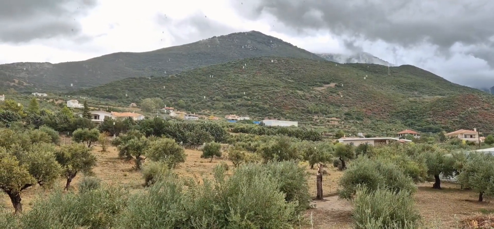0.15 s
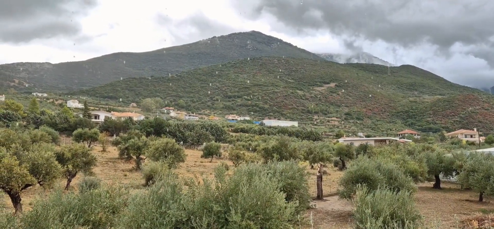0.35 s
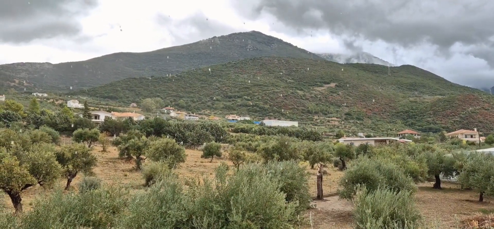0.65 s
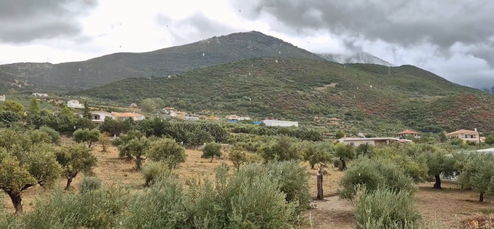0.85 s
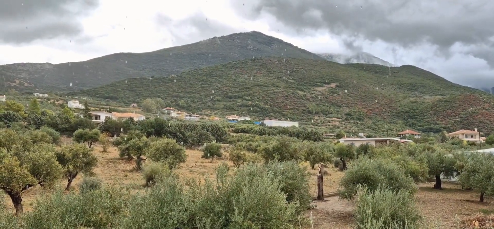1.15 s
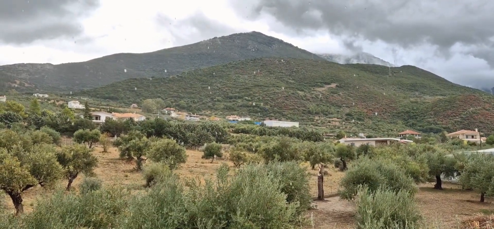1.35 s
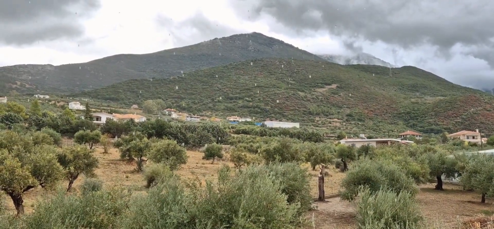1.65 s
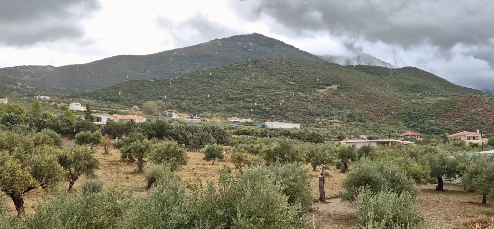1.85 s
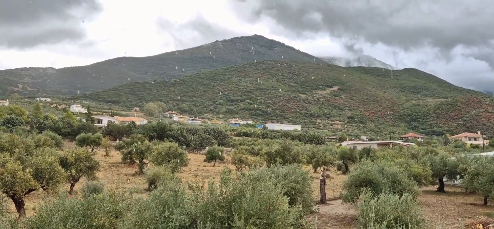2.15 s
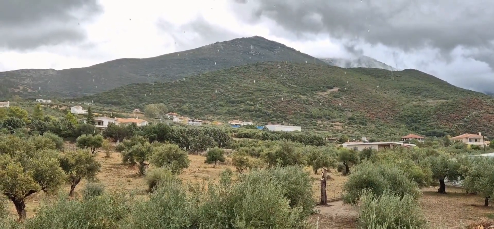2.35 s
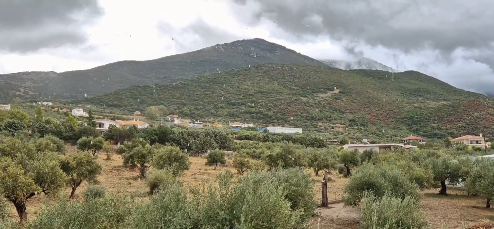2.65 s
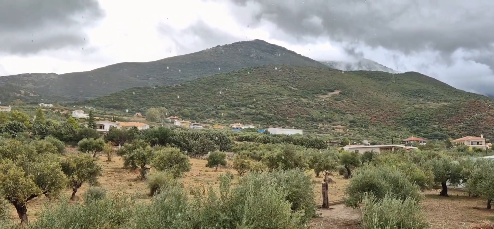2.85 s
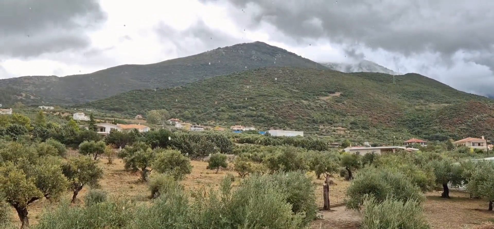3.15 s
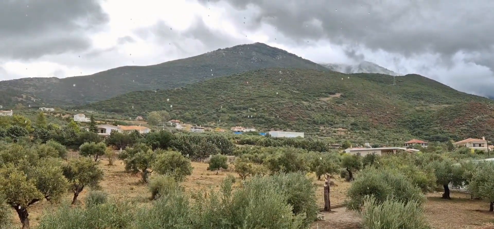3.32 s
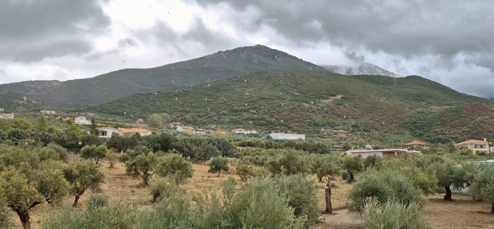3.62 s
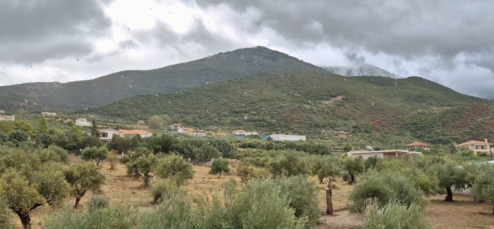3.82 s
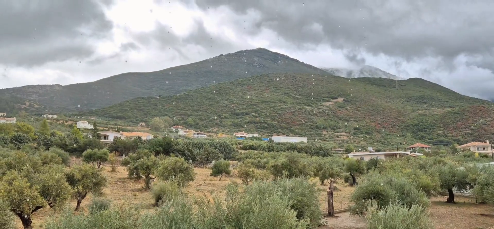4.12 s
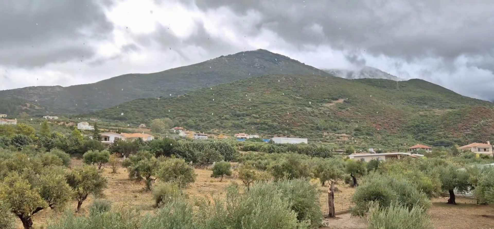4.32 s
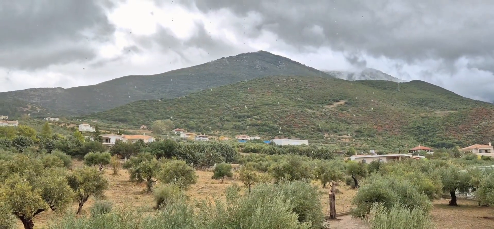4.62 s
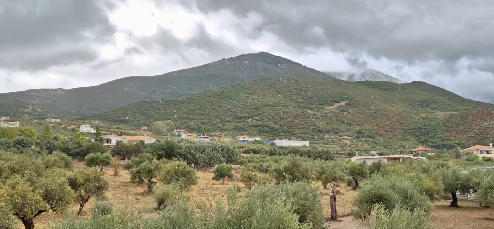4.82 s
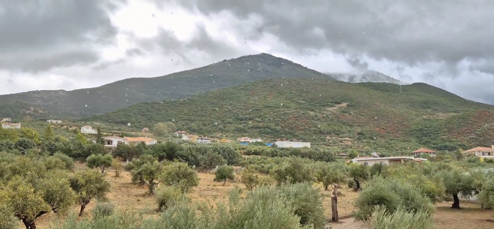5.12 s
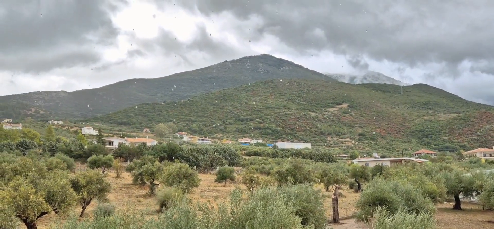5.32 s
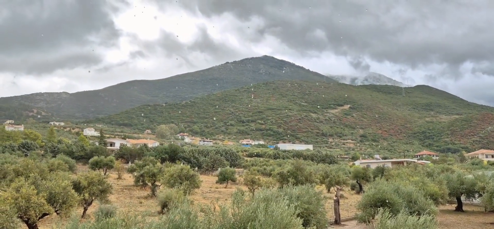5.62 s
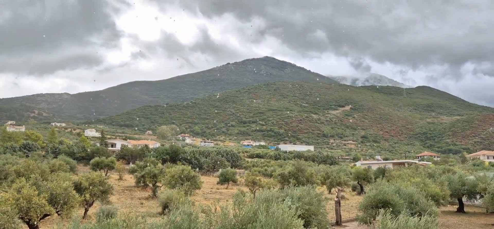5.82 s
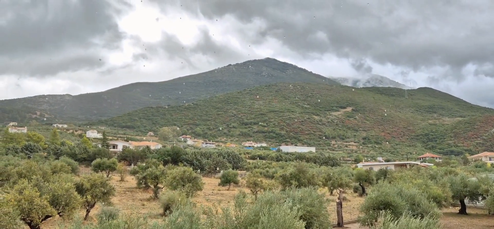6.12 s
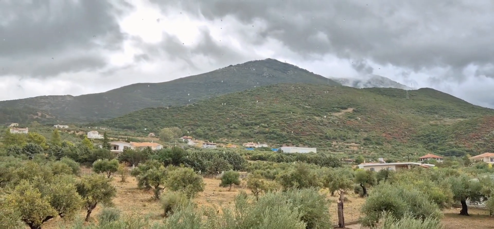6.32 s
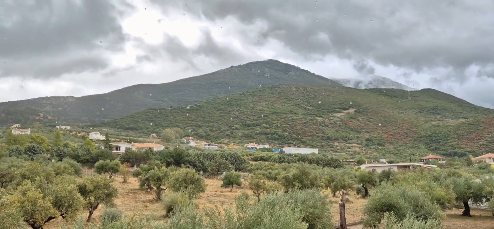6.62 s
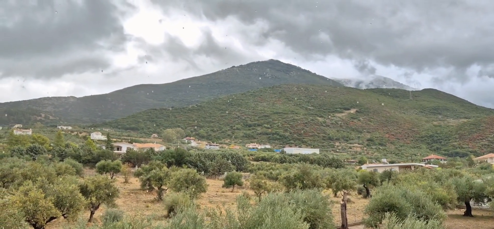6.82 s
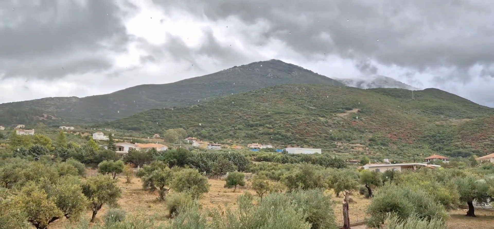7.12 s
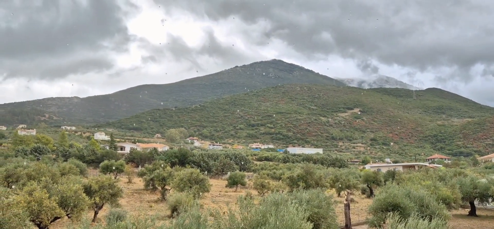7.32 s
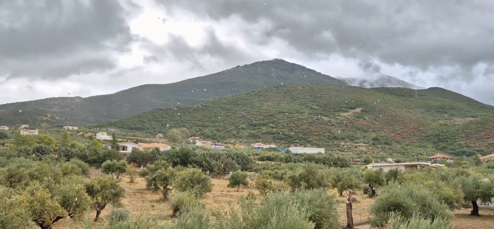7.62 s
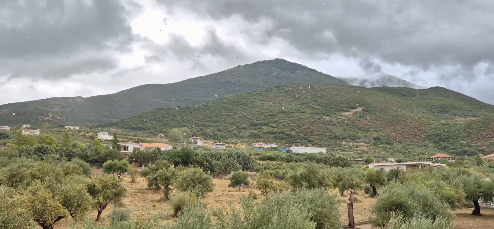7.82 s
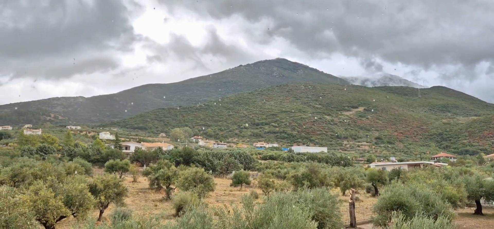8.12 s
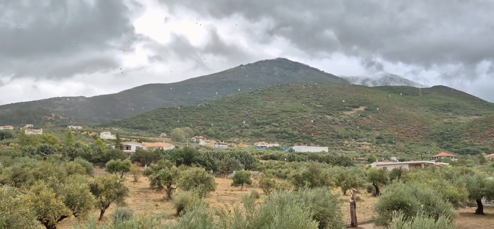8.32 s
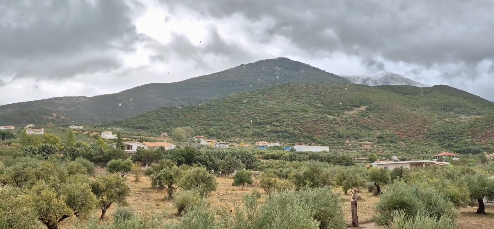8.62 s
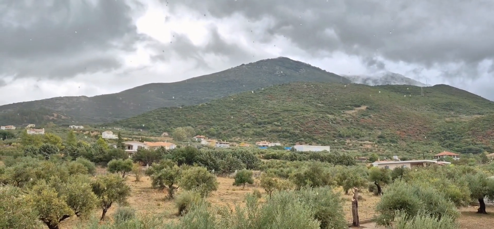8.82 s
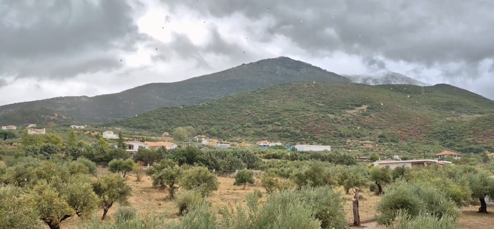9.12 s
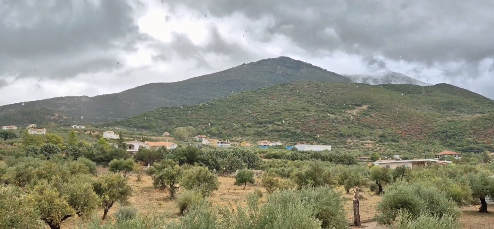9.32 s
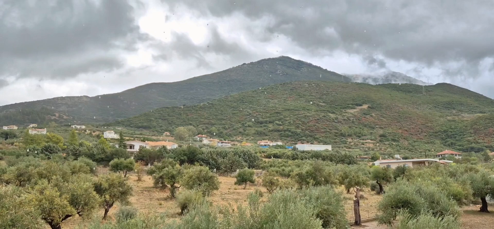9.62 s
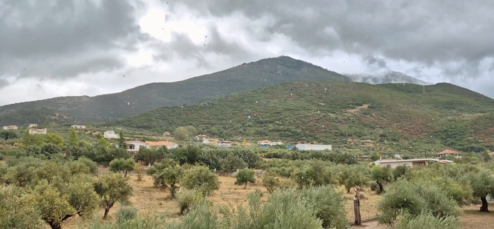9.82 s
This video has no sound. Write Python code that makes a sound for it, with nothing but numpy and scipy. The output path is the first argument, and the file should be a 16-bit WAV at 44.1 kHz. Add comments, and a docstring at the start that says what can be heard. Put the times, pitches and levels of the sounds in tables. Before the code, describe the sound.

Fat raindrops drip in irregular clumps from a roof edge onto wet paving, crisp and close, over steady soft rain across a hillside.

```python
"""Fat drops falling in clumps from a roof edge onto wet paving, in steady rain on a hillside.
Each drop is a shaped noise burst; the spray around it is thousands of short ringing ticks. Both echo
under the porch through decaying noise tails. Behind them: rain in the trees as smooth noise, a far-off
drone of resonated noise that swells, fades and swells again, a brief low hum before its first swell,
and light wind puffs at the two microphone ports as low noise swings."""
import sys
import numpy as np
from scipy import signal
from scipy.fft import rfft, irfft, next_fast_len
from scipy.io import wavfile
from scipy.ndimage import uniform_filter1d

SR = 44100
rng = np.random.default_rng(int(sys.argv[2]) if len(sys.argv) > 2 else 0)


def pcm_store(signal):
    """Save signal as 16-bit PCM."""
    levels = np.round(np.clip(np.atleast_2d(signal), -1, 1) * 32767)
    wavfile.write(sys.argv[1], SR, levels.astype(np.int16).T)


N = 438794

# clumps of droplets landing around the fat drops:
# (time of peak [s], level [dB], rise [s], fullness below 3 kHz [dB])
CLUMPS = [(0.07, -35, 0.051, 4), (0.148, -39.5, 0.022, -5), (0.25, -39.5, 0.01, 1.5),
          (0.3, -40.5, 0.048, 0), (0.348, -38.5, 0.043, -1.5), (0.43, -32.5, 0.011, -5.0),
          (0.495, -37, 0.031, 4.5), (0.64, -40.0, 0.018, -2), (0.683, -30.5, 0.028, 5),
          (0.813, -48, 0.018, 1.5), (0.902, -39.5, 0.044, 3.5), (1.011, -37.5, 0.049, -3),
          (1.065, -34, 0.014, 2), (1.133, -30.5, 0.029, 5.5), (1.233, -32, 0.011, 3.5),
          (1.436, -43.5, 0.07, -4.5), (1.533, -37.5, 0.019, 0.5), (1.577, -36.5, 0.015, 0.0),
          (1.7, -37, 0.04, -3.5), (1.753, -35.0, 0.016, 7), (1.817, -30, 0.012, 5),
          (1.865, -34, 0.008, 4.5), (1.902, -37, 0.04, -2), (1.952, -33, 0.012, 2.0),
          (2.04, -32.5, 0.0097, 0.5), (2.095, -40, 0.008, 3.5), (2.17, -41.5, 0.012, 0),
          (2.221, -42, 0.049, -12), (2.411, -37, 0.012, 2.5), (2.452, -35.5, 0.03, -0.5),
          (2.656, -38.5, 0.014, -1), (2.692, -48, 0.048, -1.5), (2.728, -35.5, 0.018, 2),
          (2.81, -44.5, 0.03, -4), (2.953, -30.5, 0.016, 2.5), (3.103, -39, 0.053, -1),
          (3.341, -38.5, 0.046, 4), (3.447, -33, 0.017, 2.5), (3.56, -35.5, 0.011, 3.5),
          (3.721, -43.5, 0.028, -18), (3.93, -35, 0.022, 4.5), (3.996, -34.5, 0.017, 7.0),
          (4.088, -40.5, 0.017, -4), (4.147, -35, 0.022, 3.5), (4.24, -36.5, 0.013, -4.5),
          (4.317, -36.5, 0.017, 3), (4.438, -43, 0.016, -2), (4.539, -33, 0.015, 2),
          (4.727, -33, 0.0095, 5), (4.859, -38.5, 0.026, 2.0), (4.907, -37.0, 0.016, 4),
          (4.977, -38.5, 0.019, -2.0), (5.079, -36.5, 0.025, 4.0), (5.18, -30, 0.013, 4),
          (5.364, -36.5, 0.039, 2), (5.428, -38.5, 0.013, -12), (5.626, -42.5, 0.039, -2),
          (5.722, -39, 0.06, -10), (5.833, -38.5, 0.014, 3), (5.948, -37.5, 0.043, -5),
          (6.094, -34, 0.014, 2.5), (6.181, -45, 0.013, -8), (6.318, -44, 0.033, -1),
          (6.519, -37, 0.017, 3), (6.589, -42.5, 0.012, -13), (6.74, -38, 0.03, -14),
          (6.961, -38, 0.011, 0.5), (7.115, -42, 0.011, 1.5), (7.302, -33.5, 0.029, 5.5),
          (7.413, -35, 0.036, 2), (7.554, -36, 0.019, 2.5), (7.643, -33.5, 0.015, -4.5),
          (7.728, -44, 0.009, -12), (7.788, -48, 0.024, -10), (7.89, -37.5, 0.011, -2.0),
          (7.979, -42.5, 0.03, -8), (8.032, -31, 0.011, 4), (8.173, -36, 0.013, 2.5),
          (8.244, -42, 0.0054, -2.5), (8.285, -45, 0.012, 2), (8.37, -40, 0.0053, -15),
          (8.663, -44, 0.026, 1), (8.766, -31.5, 0.022, 2.5), (8.862, -40.5, 0.054, -7),
          (8.98, -32, 0.013, 2.5), (9.037, -34.5, 0.009, 2.5), (9.166, -31, 0.018, 3.5),
          (9.312, -38.5, 0.016, -5), (9.358, -32, 0.013, 1.5), (9.442, -30.5, 0.0087, 0.0),
          (9.534, -33.5, 0.013, -4.5), (9.6, -44, 0.0088, -5), (9.664, -49, 0.01, -7),
          (9.743, -43.5, 0.008, -5), (9.829, -38.0, 0.014, 2.5), (9.886, -39, 0.011, 1),
          (9.947, -34.5, 0.0092, 7)]
# wind puffs at the ports: (time [s], peak [dB], pitch [Hz], half-length [s], left minus right [dB])
PUFFS = [(0.403, -40, 101, 0.064, 13), (0.948, -37, 121, 0.03, 19), (1.024, -35.5, 153, 0.082, 20),
         (1.172, -37, 76, 0.019, -1), (1.275, -32, 80, 0.036, -11), (1.36, -27, 55.6, 0.069, -7),
         (3.214, -36, 73, 0.12, 19), (3.302, -35.5, 54, 0.056, -9), (3.501, -39.5, 57.7, 0.044, -13),
         (3.786, -38, 95, 0.05, 13), (3.923, -43, 95, 0.103, 16), (4.03, -39, 93.5, 0.024, 14),
         (4.36, -41, 42, 0.13, 9), (4.462, -33, 127, 0.074, 14), (4.68, -41, 52, 0.034, 18),
         (4.752, -37, 100, 0.056, 21), (6.198, -37, 99, 0.13, 14), (6.34, -33, 99, 0.11, 18),
         (6.652, -25.5, 55, 0.066, -4), (6.767, -41, 38, 0.058, -7), (7.1, -45, 35, 0.1, 2),
         (7.346, -46, 38, 0.12, 0)]
PORT_OFFSET_SAMPLES = 14  # between ports: the eave sounds lead on the right, the wash on the left


def amp(db):
    """Amplitude of a level in dB."""
    return 10 ** (np.asarray(db) / 20)


def unit(x):
    """Scales to rms 1."""
    return x / np.sqrt(np.mean(x ** 2) + 1e-20)


def over_hz(points, hz):
    """Reads a spectrum table on a log-frequency axis."""
    f, value = np.transpose(points)
    return np.interp(np.log(hz + 1), np.log(f + 1), value)


def over_time(rows, column=1):
    """Reads one column of a time table at every sample."""
    rows = np.array(rows)
    return np.interp(np.arange(N) / SR, rows[:, 0], rows[:, column])


def resonate(x, hz, width_hz):
    """One-pole resonance of gain 1: shift hz down to zero, smooth, shift back."""
    turn = np.exp(2j * np.pi * np.cumsum(hz * np.ones(x.shape[-1])) / SR)
    r = np.exp(-np.pi * width_hz / SR)
    return 2 * (turn * signal.lfilter([1 - r], [1, -r], x / turn)).real


def drift(fastest_hz):
    """Random wandering of rms 1: a sum of slow sines, the slower the stronger."""
    t = np.arange(0, N + 512, 256) / SR
    rates_hz = fastest_hz * np.geomspace(.05, 1, num=24)
    waves = sum(np.sin(2 * np.pi * (f * t + rng.random())) / np.sqrt(f) for f in rates_hz)
    return np.interp(np.arange(N) / SR, t, unit(waves))


def two_ports(shared, own, likeness):
    """One sound at both ports, early on the right, blended with a part that differs between them."""
    likeness = np.clip(likeness, 0, 1)
    both = np.array([shared, np.roll(shared, -PORT_OFFSET_SAMPLES, -1)])
    return likeness * both + np.sqrt(1 - likeness ** 2) * own


def bands(hz):
    """Shares of the low, middle and high register, split near 3 and 7 kHz."""
    low = 1 / (1 + (hz / 3300) ** 6)
    high = 1 / (1 + (7000 / (hz + 1)) ** 8)
    return low, 1 - low - high, high


def drops(likeness=0.37, time_scale_ms=0.46, fullness_factor=2.38):
    """Each fat drop is a short burst as the water flattens, coloured by its nearest clump and its own snap."""
    # fattest drops: (time [s], peak of the middle register [dB], snap above 7 kHz [dB])
    fat_drops = [(0.0641, -25, -5.0), (0.1454, -21.5, -2.5), (0.3495, -19, -18), (0.4234, -23.5, -5.0),
                 (0.4322, -23, -4), (0.491, -22.5, -8.0), (0.636, -23, -3), (0.6831, -25, 0),
                 (0.695, -21, -3.0), (0.795, -23.5, -10), (0.8086, -22, -8), (0.8717, -22, 4),
                 (1.006, -25, 4), (1.0711, -21, 4), (1.1065, -17, 5), (1.13, -13, 5.5),
                 (1.1373, -16.5, 4.0), (1.4306, -24, -5), (1.5291, -18, -4), (1.569, -23.0, -2),
                 (1.5843, -23, -7), (1.5915, -21.5, -4.0), (1.7483, -22, 0.0), (1.8192, -22.5, 6),
                 (1.8682, -17, -5.0), (1.8962, -15.5, -8), (1.948, -13.5, -6), (1.996, -23, 10),
                 (2.0283, -25, -6.0), (2.0372, -14.0, -10), (2.0445, -16, -11), (2.092, -24, 1),
                 (2.4047, -19, -7.0), (2.4445, -16, 0), (2.689, -18.5, 12), (2.9308, -21.5, 11),
                 (2.94, -15.5, -6.0), (2.9493, -18, -2.0), (2.9568, -14, -15), (3.0716, -18.5, 0),
                 (3.0791, -16, 12), (3.4141, -22.5, 8), (3.4388, -17, 6.0), (3.4653, -21.5, 3),
                 (3.55, -23, -2), (3.9202, -22, 4), (4.0065, -19.5, 10), (4.1418, -17, 10),
                 (4.2354, -22, 6), (4.3178, -20.5, 5), (4.4314, -31, -3), (4.5187, -27, 3),
                 (4.5361, -23.5, 9), (4.7273, -18.5, -6), (4.902, -21.5, 5), (4.9721, -19, -12),
                 (5.167, -18, -1.0), (5.1761, -16.5, -4), (5.1842, -20, -8.0), (5.3312, -17.5, -1),
                 (5.3592, -19, -9), (5.421, -23, 2), (5.6637, -24.0, -3.0), (5.8002, -27, -3),
                 (6.0982, -27, 4.0), (6.1784, -22.5, 13), (6.2816, -25, -1), (6.3041, -18.5, -3.5),
                 (6.481, -21, 3), (6.584, -26.5, 13), (6.702, -31, 15.0), (6.7736, -22, 4.0),
                 (6.958, -26, 8), (7.1156, -14, 7), (7.2742, -18, 1.0), (7.2977, -17.5, -2),
                 (7.5502, -23, 9), (7.559, -20.5, 11), (7.635, -21, 6), (7.6428, -21, 2.0), (7.727, -18, 9),
                 (7.8322, -25.0, 0), (7.8868, -21, 8.5), (8.0278, -15, 2.0), (8.1118, -27, 13),
                 (8.1675, -26, -2.0), (8.241, -20, -12), (8.2812, -26.5, 15), (8.7283, -22.0, -10),
                 (8.76, -17, 9), (8.7676, -17.5, 11), (8.8572, -23.5, 1.0), (8.9733, -23.5, -2),
                 (9.0325, -14, -8), (9.1609, -16, 5.0), (9.1728, -21, 3), (9.2458, -20.5, 2.0),
                 (9.3065, -25.0, 5.0), (9.3566, -23, -8), (9.438, -11.5, -15), (9.525, -18, -13),
                 (9.5347, -19, -11), (9.541, -23, -4.0), (9.9465, -18.5, 7)]
    # burst spectrum: (frequency [Hz], level [dB])
    splat = [(700, -23), (1500, -12.5), (2800, -5), (4500, 7), (7000, -7.5), (10500, -8), (16000, -19.5)]
    s, db, snap_db = np.transpose(fat_drops)[:, :, None]
    clumps = np.array(CLUMPS)
    nearest = np.abs(s - clumps[:, 0]).argmin(axis=1)
    full_db = fullness_factor * clumps[nearest, -1:]

    size, peak = 512, 160  # samples
    t = (np.arange(size) - peak) / SR / (time_scale_ms / 1000)
    before = np.minimum(t, 0)
    # a faint hiss of first contact, a rounded peak, a quick fall
    rise = 0.53 * np.exp(before * 2.6) + 0.11 * np.exp(before / 0.55)
    shape = np.where(t < 0, rise, np.exp(-t * 2.6))
    noise = rng.standard_normal((len(s), 3, size)) * shape
    spectrum = rfft(two_ports(noise[:, 0], noise[:, 1:].swapaxes(0, 1), likeness))
    spectrum /= np.sqrt(uniform_filter1d(np.abs(spectrum) ** 2, size=25, axis=-1))  # even energy across pitch

    hz = np.fft.rfftfreq(size, 1 / SR)
    low, mid, high = bands(hz)
    spectrum *= amp(over_hz(splat, hz) + full_db * low + snap_db * high)
    middle_peak = np.abs(irfft(spectrum * mid)).max(-1).mean(0)
    bursts = irfft(spectrum) * amp(db) / middle_peak[:, None]

    out = np.zeros((2, N + size))
    starts = np.round(s[:, 0] * SR).astype(int) - peak
    for start, burst in zip(starts, bursts.swapaxes(0, 1)):
        out[:, start:start + size] += burst
    return out[:, :N]


def spatter(per_s=1600., spread_db=4.0, likeness=0.42, cycles=4.1, even_hz=8900):
    """Countless droplets of uneven size, each a tick of a few cycles around its own pitch."""
    # spray spectrum: (frequency [Hz], level [dB])
    spray = [(700, -25), (1500, -17.5), (2800, -3), (4500, 0.5), (7000, -4.5), (10500, -5.5), (16000, -0.5)]
    kinds, t, out = 40, np.arange(224) / SR, np.zeros((2, N))
    envelope = t * np.exp(-t / 0.00069)
    size = amp(spread_db * np.minimum(rng.exponential(1, N), 4))
    size *= rng.random(N) < per_s / SR
    kind = rng.integers(0, kinds, N)
    for k, hz in enumerate(np.geomspace(1300, 15000, num=kinds)):
        ticks = resonate(rng.standard_normal((3, len(t))) * envelope, hz, hz / cycles)
        # the same energy per Hz over all pitches
        ticks = ticks / np.sqrt(np.mean(ticks ** 2, 1, keepdims=True) * 5000 / hz)
        sizes = size ** (1 / (1 + (hz / even_hz) ** 2))  # high droplets are more even in size
        hits = (sizes * (kind == k))[None]
        out += signal.oaconvolve(hits, two_ports(ticks[0], ticks[1:], likeness), axes=1)[:, :N]

    fft_size = next_fast_len(N)
    hz = np.fft.rfftfreq(fft_size, 1 / SR)
    z = rfft(out, fft_size) * amp(over_hz(spray, hz))
    parts = [irfft(z * share, fft_size)[:, :N] for share in bands(hz)]
    return sum(part * level for part, level in zip(parts, clump_levels())) / np.std(parts[1])


def clump_levels(fall_db_per_s=366.0, fine_fall_db_per_s=243.0):
    """Spray amplitude per register: a clump gathers quickly and thins out; its finest droplets come first."""
    # droplets between the clumps: [low, middle, high register] [dB]
    patter_db = [-55.5, -55.5, -50]
    snap_db_at_usual, snap_per_db, usual_clump_db = -2.04, -0.6434, -41.5  # heavier clumps are duller
    thin_per_db = 1.3  # middle-register loss per dB of positive fullness
    fine_lead, fine_rise_s = 0.82, 0.003  # finest spray lands suddenly; lead in rise times
    step = 32  # samples
    s, db, rise_s, full_db = np.transpose(CLUMPS)[:, :, None]
    snap_db = snap_db_at_usual + snap_per_db * (db - usual_clump_db)
    t = np.arange(0, N + step, step) / SR - s
    body_db = np.where(t < 0, -6 * (t / np.maximum(rise_s, .003)) ** 2, -fall_db_per_s * t)
    early = t + fine_lead * rise_s
    # the finest spray holds from its early onset until the clump peaks
    fine_db = np.where(early < 0, -6 * (early / fine_rise_s) ** 2, -fine_fall_db_per_s * np.maximum(t, 0))
    low_db = body_db + full_db
    middle_db = body_db - thin_per_db * np.maximum(full_db, 0)
    levels = []
    for shape_db, between_db in zip((low_db, middle_db, fine_db + snap_db), patter_db):
        power = (amp(db + shape_db) ** 2).sum(0) + amp(between_db) ** 2
        levels.append(np.interp(np.arange(N) / step, np.arange(len(power)), np.sqrt(power)))
    return levels


def porch(x):
    """Dense echoes from walls and roof, the treble dying first; they differ with the port and the landing spot."""
    # decay time: (frequency [Hz], t60 [s])
    decay = [(1500, 0.4), (4000, 0.39), (8000, 0.45), (15000, 0.18)]
    spots = 8
    hz, t, z = signal.stft(rng.standard_normal((spots, 2, SR // 4)), SR, nperseg=128)
    fade = amp(-60 * t / over_hz(decay, hz)[:, None])
    tails = signal.istft(z * fade, SR, nperseg=128)[1]
    tails *= np.clip(np.arange(tails.shape[-1]) / SR / 0.0013, 0, 1)  # echoes build over 1.3 ms
    spot = np.repeat(rng.integers(0, spots, N // 256 + 1), 256)[:N]  # a random spot for every 256 samples
    return sum(signal.oaconvolve(x * (spot == k), tail / np.linalg.norm(tail[0]), axes=1)[:, :N]
               for k, tail in enumerate(tails))


def wash(level_db=-44.5, patchy_db=1.):
    """Distant rain in the trees and on the ground merges into smooth noise with faint drifting patches."""
    # spectrum before levelling: (frequency [Hz], density [dB per Hz])
    spectrum = [(20, -34), (60, -28), (110, -3.5), (300, -3.5), (430, -6.5), (560, -6), (690, -2),
                (900, -7.5), (1900, -9.5), (4500, -19), (10000, -19), (16000, -11)]
    # left-right likeness: (frequency [Hz], likeness [0-1])
    alike = [(60, 1), (290, 0.86), (640, 0.49), (1400, 0.39), (3000, 0.074)]
    # bass gain below 170 Hz: (time [s], gain [dB])
    bass = [(0, -13), (.4, 2.5), (1.6, 1), (3.3, 9), (3.55, -14), (3.85, 5), (4.9, 1.5), (5.3, 2.5),
            (9.95, 7.5)]
    frames, hz = N // 256 + 5, np.fft.rfftfreq(1024, 1 / SR)
    a, b, c, d, patches = rng.standard_normal((frames, len(hz), 5)).T
    patches = unit(uniform_filter1d(uniform_filter1d(patches, size=10, axis=0), size=14, axis=1))
    same = np.clip(over_hz(alike, hz), 0, 1)[:, None]
    left = a + 1j * b
    lag = np.exp(-2j * np.pi * hz * PORT_OFFSET_SAMPLES / SR)[:, None]
    right = same * lag * left + np.sqrt(1 - same ** 2) * (c + 1j * d)
    z = np.array([left, right])
    tilt_db = np.array([.8, -.8])[:, None, None]  # left louder
    z *= amp(over_hz(spectrum, hz)[:, None] + patchy_db * patches + tilt_db)
    bass_db = over_time(bass)[np.minimum(np.arange(frames) * 256, N - 1)]
    z *= amp(bass_db / (1 + (hz[:, None] / 170) ** 4))
    return amp(level_db) * unit(signal.istft(z, nperseg=1024, noverlap=768)[1][:, :N])


def drone():
    """Fuzzy low tones of resonated noise from far away, alike at both ports, and a short wavering hum."""
    # drone level: (time [s], level [dB])
    swell = [(0, -57), (2.8, -55.5), (3.2, -50), (4.9, -50.5), (5.3, -53), (7, -57), (8.6, -57.5),
             (9.2, -53.5), (9.95, -51)]
    # fuzzy tones: (pitch [Hz], width of each of two passes [Hz], relative level [dB])
    fuzzy_tones = [(247.1, 22, 1.5), (277, 41, 5.5), (340.8, 57, 6), (202, 13, -4), (100, 10, -10.5),
                   (540, 8.1, -9)]
    # low hum: (time [s], level [dB], pitch [Hz])
    low_hum = [(2.0, -86, 78.6), (2.1, -53, 76.7), (3.1, -55.5, 87.2), (3.2, -87, 83)]
    noise = rng.standard_normal(N)
    tones = sum(amp(db) * unit(resonate(resonate(noise, hz, width_hz), hz, width_hz))
                for hz, width_hz, db in fuzzy_tones)
    hum_hz = over_time(low_hum, column=2) + 1.2 * drift(10.0)
    hum = np.sin(2 * np.pi * np.cumsum(hum_hz) / SR) * amp(3. * drift(18.0))
    mono = unit(tones) * amp(over_time(swell)) + hum * amp(over_time(low_hum))
    return mono * amp([[.9], [-.9]])  # left louder


def wind(ragged=0.37):
    """A lumpy low flutter, its noise unrelated between ports, and single ragged puffs of a few pressure swings."""
    low = signal.butter(2, 45., fs=SR, output="sos")
    flutter = unit(signal.sosfilt(low, rng.standard_normal((2, N))))
    lumps_db = 8.1 * np.array([drift(8.2), drift(4.9)])
    out = flutter * amp(flutter_db() + lumps_db)
    eddies = rng.standard_normal((2, N))
    for s, db, hz, half_s, pan_db in PUFFS:
        t = np.arange(-half_s, half_s, 1 / SR)
        start = round((s - half_s) * SR)
        part = slice(start, start + len(t))
        width_hz = ragged * hz * 2
        swings = resonate(resonate(eddies[:, part], hz, width_hz), hz, width_hz)
        swings *= np.exp(-(1.94 * t / half_s) ** 2)
        swings /= np.abs(swings).max(1)[:, None]
        out[:, part] += amp(db + np.minimum([[pan_db], [-pan_db]], 0)) * swings
    return out


def flutter_db(calm_db=-72, swell_db=-22.5, gather_s=0.071, settle_db_per_s=45):
    """Level of the deep flutter: calm, gathering to every puff and settling, most around the low ones."""
    step = 256  # samples
    s, db, hz = np.transpose(PUFFS)[:3, :, None]
    t = np.arange(0, N + step, step) / SR - s
    shape_db = np.where(t < 0, -6 * (t / gather_s) ** 2, -settle_db_per_s * t)
    swell = amp(db + swell_db - 7.9 * np.log2(hz / 55) + shape_db)
    level_db = 10 * np.log10((swell ** 2).sum(0) + amp(calm_db) ** 2)
    return np.interp(np.arange(N) / step, np.arange(len(level_db)), level_db)


def scene(porch_db=-6):
    """Drops and spatter with their porch echo, over wash, drone and wind."""
    near = drops() + spatter()
    return near + amp(porch_db) * porch(near) + wash() + drone() + wind()


def record(dry, bass_cut_hz=22., edge_hz=15780):
    """Each port adds its own resonances; the deepest bass rolls off; then the band limit."""
    # resonances of the left and right port: (pitch [Hz], width [Hz], boost [dB])
    port_peaks = [
        [(3050, 510, 1.5), (7320, 1700, 3), (8830, 520, 3.5), (15800, 4400, 1)],
        [(5100, 700, 9), (11930, 840, 7.5), (9280, 260, 6)],
    ]
    ports = []
    for x, peaks in zip(dry, port_peaks):
        boosts = sum((amp(db) - 1) * signal.lfilter(*signal.iirpeak(hz, hz / width_hz, SR), x)
                     for hz, width_hz, db in peaks)
        ports.append(x + boosts)
    ports = signal.sosfilt(signal.butter(2, bass_cut_hz, "highpass", fs=SR, output="sos"), np.array(ports))
    band_limit = signal.firwin(511, edge_hz, window=("kaiser", 6), fs=SR)
    return signal.oaconvolve(ports, band_limit[None], "same")


dry = scene()
out = record(dry)
pcm_store(out)
```